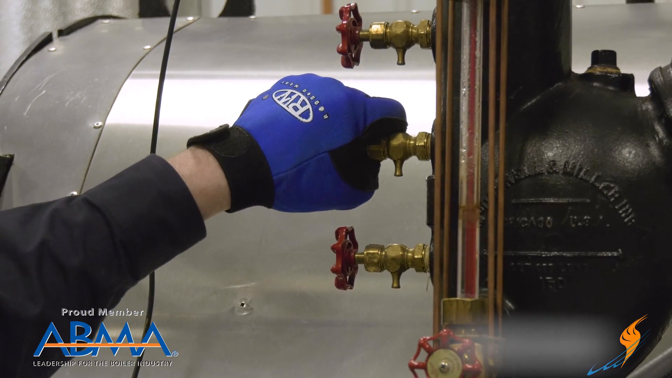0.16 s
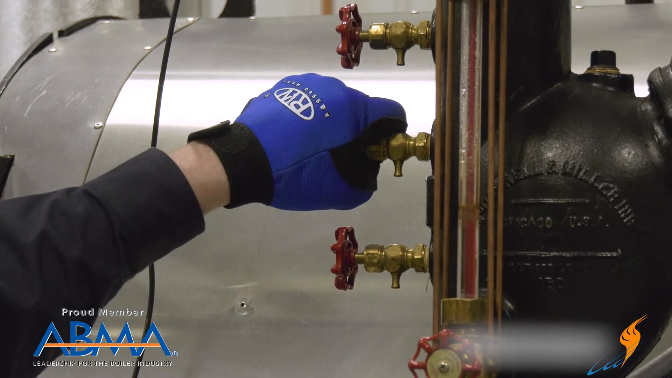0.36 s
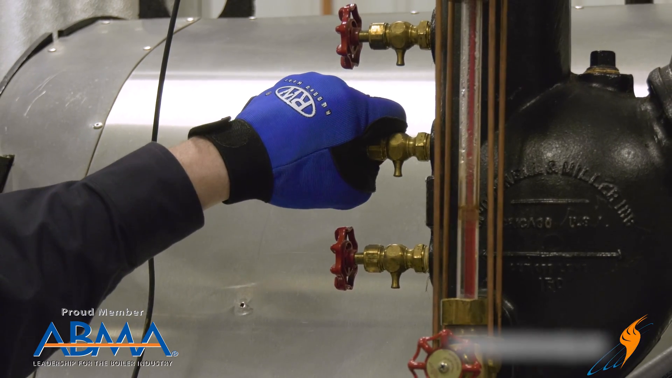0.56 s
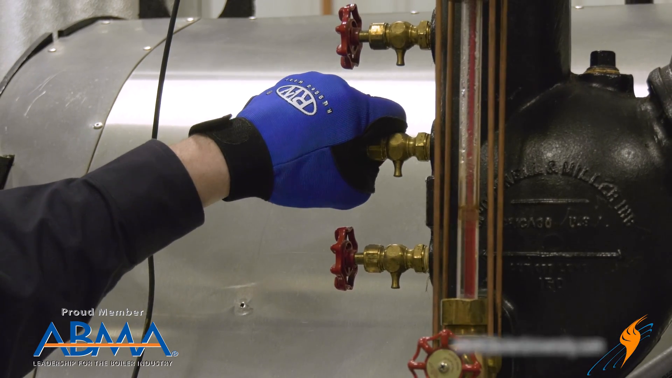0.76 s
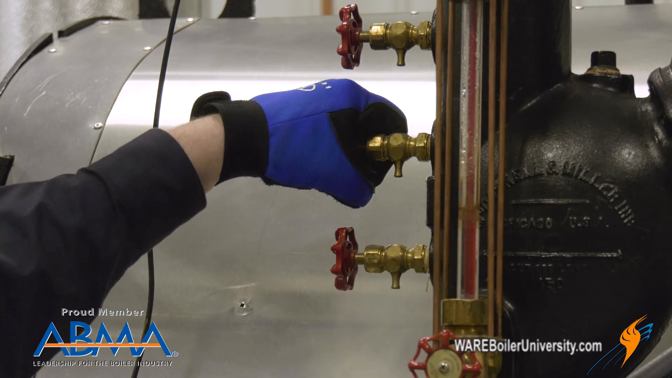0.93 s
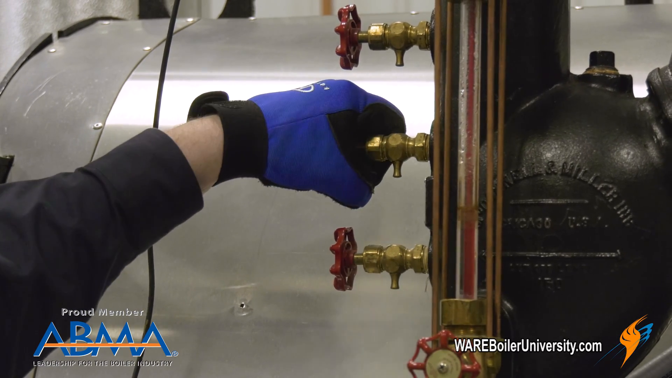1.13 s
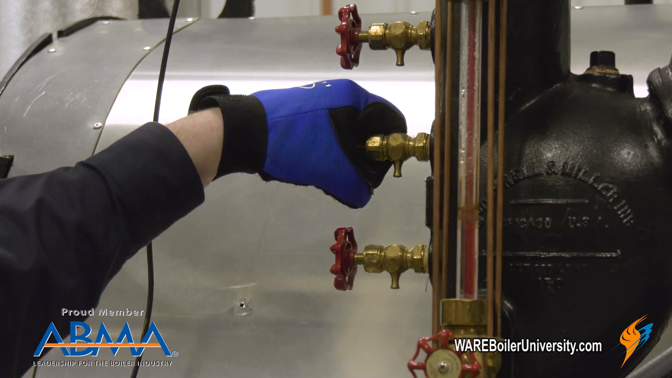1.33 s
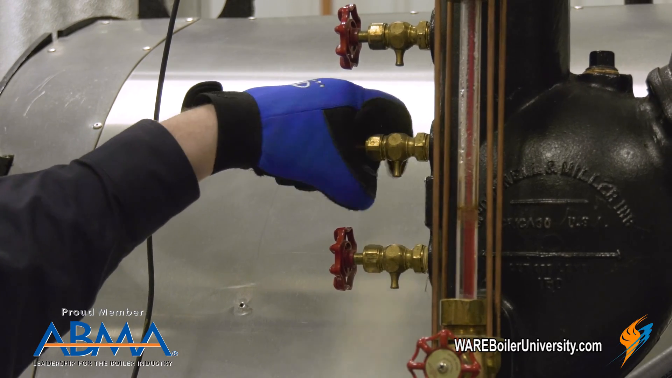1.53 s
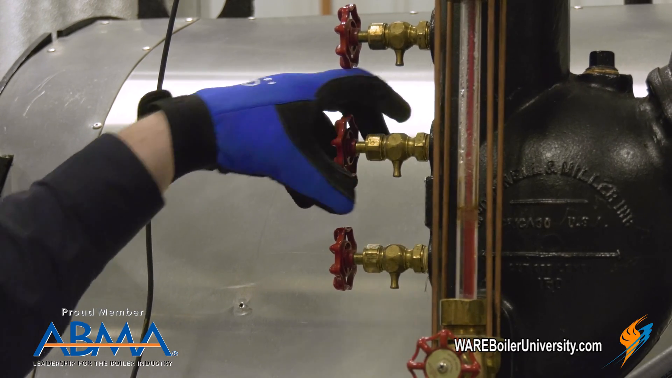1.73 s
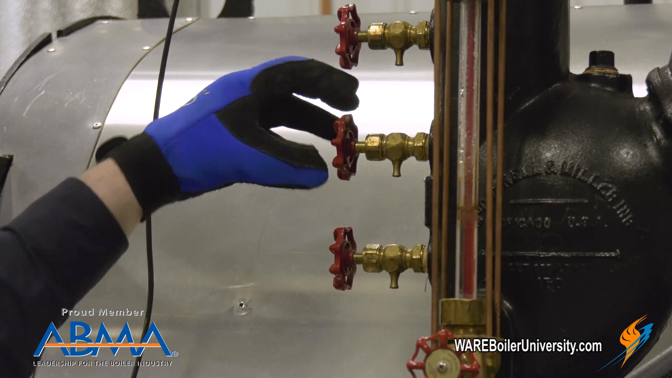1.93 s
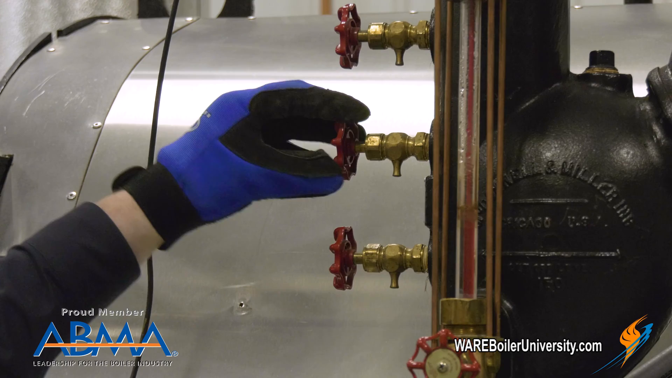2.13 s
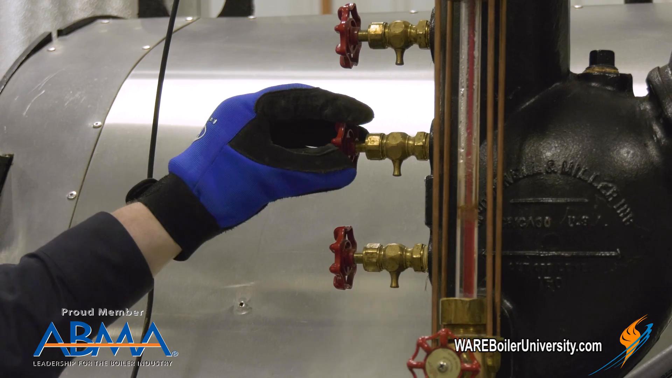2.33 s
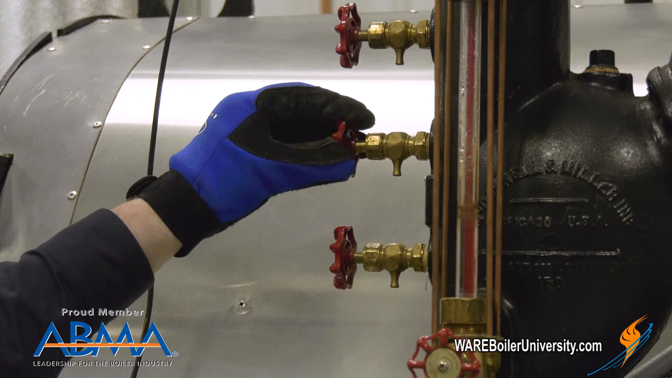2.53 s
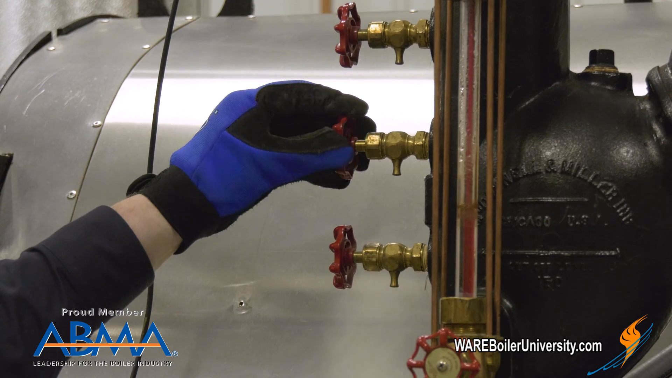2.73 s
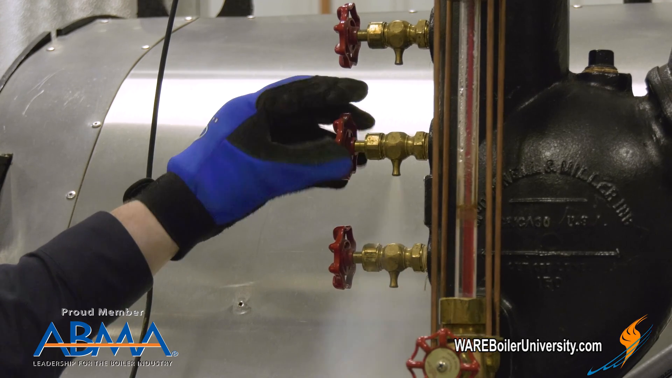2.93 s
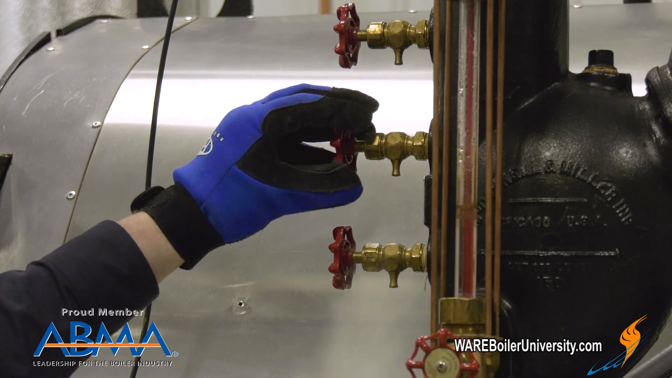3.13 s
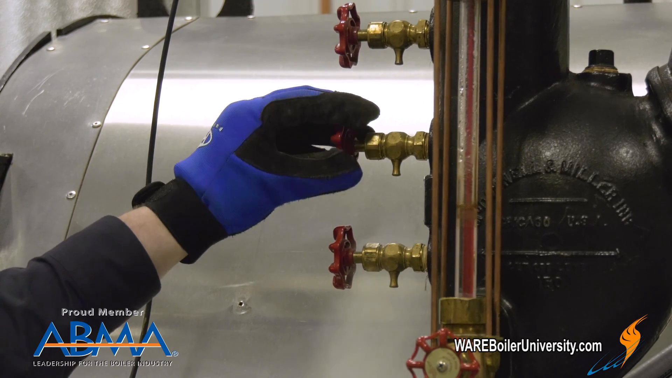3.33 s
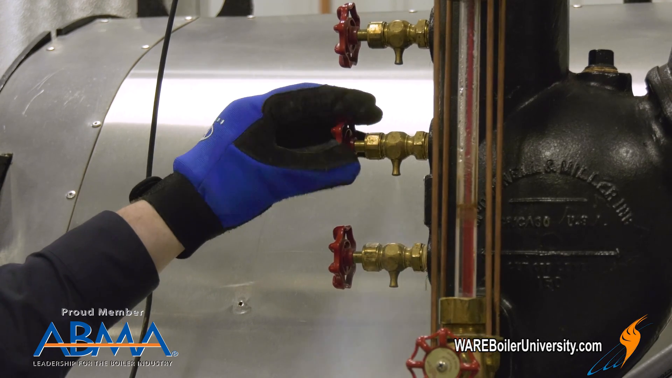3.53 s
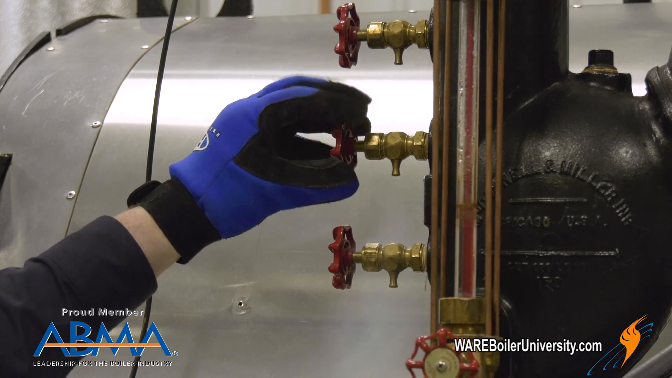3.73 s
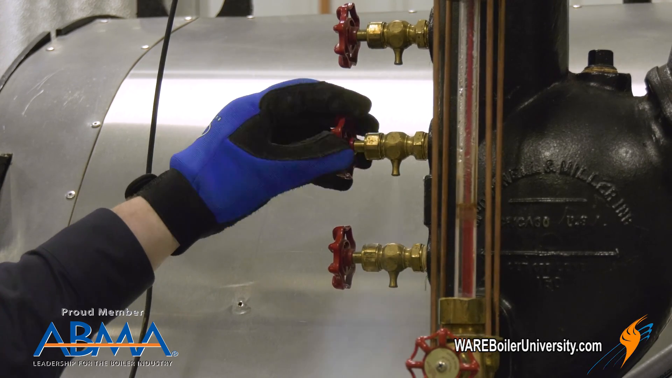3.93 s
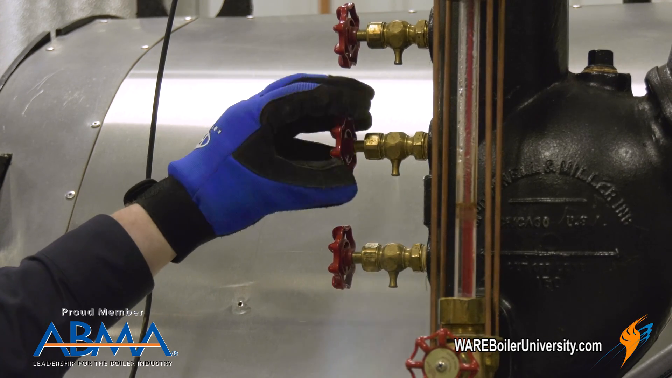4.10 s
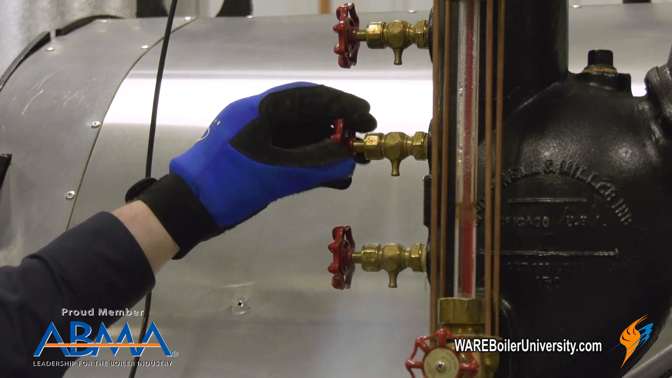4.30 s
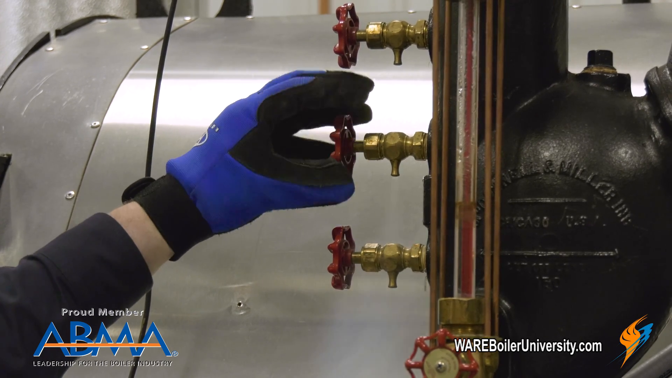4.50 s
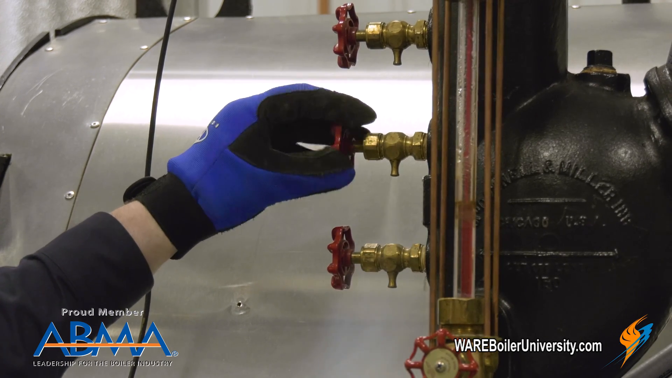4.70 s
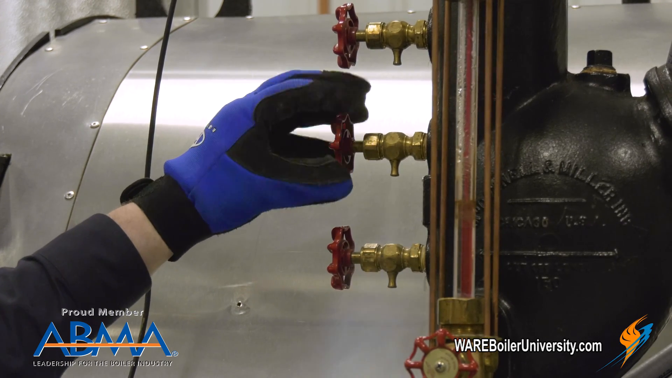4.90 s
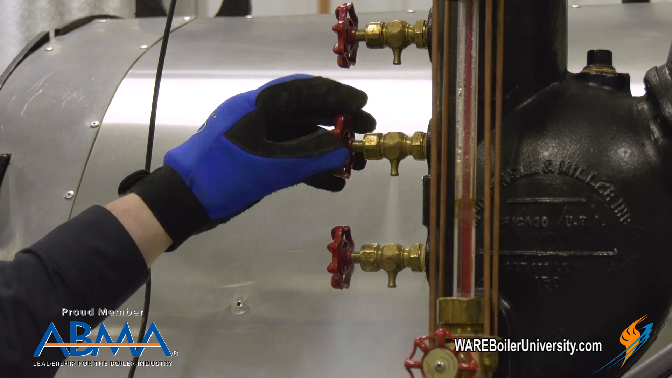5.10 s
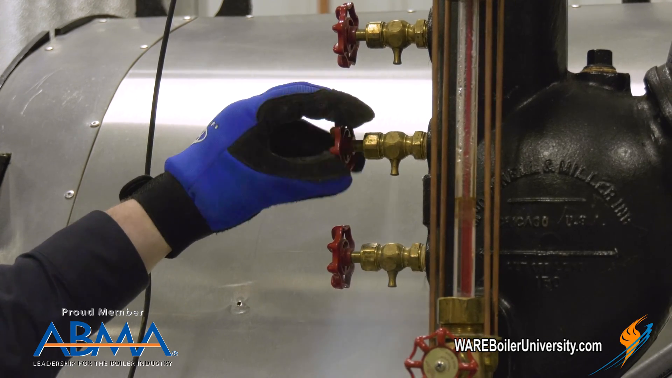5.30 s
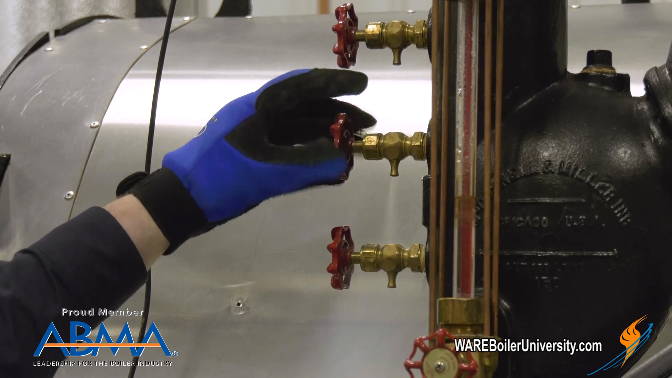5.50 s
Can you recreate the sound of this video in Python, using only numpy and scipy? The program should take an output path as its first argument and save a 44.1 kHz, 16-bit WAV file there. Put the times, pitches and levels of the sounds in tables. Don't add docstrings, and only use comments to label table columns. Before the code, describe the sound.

Quiet boiler-room hum, a brief creak and whistling spit, ticking water droplets in a thin hiss, then a loud full steam-like jet.

```python
import sys
import numpy as np
from scipy import signal
from scipy.fft import rfft, irfft
from scipy.io import wavfile
from scipy.ndimage import uniform_filter1d

SR = 44100
rng = np.random.default_rng(int(sys.argv[2]) if len(sys.argv) > 2 else 0)


def inscribe(sig):
    pcm = np.round(np.clip(np.atleast_2d(sig).T, -1, 1) * 32767)
    wavfile.write(sys.argv[1], SR, pcm.astype(np.int16))


def gain_from_decibels(decibels):
    exponent = np.asarray(decibels, float) / 20
    return 10 ** exponent


N = 244755
HOP = 128
HZ = np.fft.rfftfreq(4 * HOP, 1 / SR)[:, None]
FRAME_S = np.arange(N // HOP + 5) * HOP / SR


def evened(x):
    return x / np.sqrt(np.mean(x ** 2) + 1e-30)


def read(points, hz):
    f, value = np.transpose(points)
    return np.interp(np.log(hz + 1), np.log(f), value)


def curves(rows, t):
    s, *columns = np.transpose(rows)
    return [np.interp(t, s, c) for c in columns]


def add(mix, s, sound):
    part = mix[round(s * SR):][:len(sound)]
    part += sound[:len(part)]


def ramp(t, start_s, rise_s):
    return np.clip((t - start_s) / rise_s, 0, 1)


def settle(t, start_s, time_s):
    return 1 - np.exp(-np.maximum(t - start_s, 0) / time_s)


def bumps(rows):
    return sum(np.exp(-(2 * (HZ - hz) / width) ** 2) * db for hz, width, db in rows)


def layer(shape):
    power = gain_from_decibels(read(shape, HZ)) ** 2
    return power / power.sum()


def noise(power):
    overlap = dict(nperseg=4 * HOP, noverlap=3 * HOP)
    a, b = rng.standard_normal((len(FRAME_S), len(HZ), 2)).T
    random_bins = a + 1j * b
    white = signal.istft(random_bins, **overlap)[1].std() * np.sqrt(len(HZ))
    shaped = signal.istft(random_bins * np.sqrt(power), **overlap)[1][:N]
    return shaped / white * len(HZ)


def drift(frames, bins):
    field = rng.standard_normal((len(FRAME_S), len(HZ))).T
    field = uniform_filter1d(field, int(bins), axis=0)
    return evened(uniform_filter1d(field, int(frames), axis=1))


def resonate(x, hz, width):
    turn = np.exp(2j * np.pi * np.cumsum(hz * np.ones(len(x))) / SR)
    r = np.exp(-np.pi * width / SR)
    return 2 * (turn * signal.lfilter([1 - r], [1, -r], x / turn)).real


# pitch in Hz, level in dB per Hz.
ROOM_WASH = [(25, -40), (45, -27), (65, -1), (110, 0), (170, -6), (350, -20), (700, -18.5), (1800, -22),
             (3000, -26), (5000, -29.5), (7500, -35), (10000, -38), (13000, -41), (15700, -45)]
# pitch in Hz, width in Hz, boost in dB.
FAN_RESONANCES = [(120, 17, 4), (298, 30, 12), (1240, 200, 6), (1480, 250, 7), (3600, 400, 7),
                  (4400, 250, 11), (5930, 250, 5), (7950, 300, 11)]
# pitch in Hz, level in dB.
MOTOR_TONES = [(60.5, -66), (119.9, -59.5), (1199, -80), (1426, -79), (2099, -80), (2702, -87), (7932, -77),
               (8000, -80), (8069, -72)]


def plant_room():
    fade_db = 4 * ramp(FRAME_S, 0.27, 0.16) + 10 * np.minimum(FRAME_S, 1)
    low_db, high_db = -56.5 - fade_db, -66 - 0.6 * fade_db
    draught = layer([(100, -8), (300, -2), (600, -8), (1200, -21), (4000, -39)]) * gain_from_decibels(low_db) ** 2
    airy = layer([(2000, 0), (4000, 2), (9000, -4), (12000, -11), (15000, -15)])
    draught = draught + airy * gain_from_decibels(high_db) ** 2

    t = np.arange(N) / SR
    white = rfft(rng.standard_normal(N))
    hz = np.fft.rfftfreq(N, 1 / SR)
    fans_db = sum(db * np.exp(-(2 * (hz - fan_hz) / width) ** 2) for fan_hz, width, db in FAN_RESONANCES)
    wash = evened(irfft(white * gain_from_decibels(read(ROOM_WASH, hz) + fans_db), N))
    burner_db = -56
    for line_hz, db in MOTOR_TONES:
        waver = 1 + 0.08 * evened(resonate(rng.standard_normal(N), 0, 12))
        tone = np.sin(2 * np.pi * (line_hz * t + rng.random()))
        wash = wash + np.sqrt(2) * gain_from_decibels(db - burner_db) * waver * tone
    sink_db = 10.5 * settle(t, 1.6, 0.54)
    return gain_from_decibels(burner_db - sink_db) * wash + noise(draught)


def whistle_track(t):
    lead_s, dive_s, dive_end_s = 0.951, 0.9728, 0.9887
    edge_db_per_s = 6000
    hz = 15600 - 420000 * np.clip(t - dive_s, 0, 0.02)
    lead_db = -39 + 3 * np.cos(2 * np.pi * 130 * (t - 0.958))
    sag_db = np.where(t < dive_s, edge_db_per_s / 2 * (dive_s - t), 170 * (t - dive_s))
    dive_db = -25.5 - sag_db
    outside_s = np.maximum(lead_s - t, 0) + 4 * np.maximum(t - dive_end_s, 0)
    return hz, np.maximum(lead_db, dive_db) - edge_db_per_s * outside_s


# time in seconds, level in dB.
SPURT_HISS = [
    (.8835, -75),
    (.887, -45),
    (.898, -43.5),
    (.905, -38.5),
    (.94, -39),
    (.952, -34.5),
    (.977, -32.5),
    (.999, -48),
    (1.1, -68),
]
# pitch in Hz, level in dB per Hz.
SPURT_COLOUR = [(300, -8), (1500, -1), (2600, -7), (3500, -2), (6500, -1), (8000, -6), (9000, 0),
                (11500, -4), (15700, -5)]
# time in seconds, height (minus sucks inward), width in milliseconds.
PRESSURE_POPS = [
    (.9598, .06, .2),
    (.9661, -.07, .45),
    (.9687, .05, .2),
    (.9745, -.04, 1.2),
    (.9779, -.05, .25),
    (.9787, .11, .25),
    (.9801, .05, .25),
]


def spurt():
    t = np.arange(N) / SR
    hiss_db = curves(SPURT_HISS, t)[0]
    live = (t > SPURT_HISS[0][0]) & (t < SPURT_HISS[-1][0])
    low_share = 0.2
    hiss = (1 - low_share) * noise(layer(SPURT_COLOUR))
    hiss = hiss + low_share * noise(layer(ROAR) + layer(RUMBLE))
    spit = gain_from_decibels(1.8 * evened(uniform_filter1d(rng.standard_normal(N), size=60)))

    hz, whistle_db = whistle_track(t)
    pure = np.sqrt(2) * np.sin(2 * np.pi * np.cumsum(hz) / SR)
    breath = evened(resonate(rng.standard_normal(N), hz, 700))
    tone = np.clip((15500 - hz) / 300, 0, 1) * pure + 0.45 * breath
    whistle = (whistle_db > -59) * gain_from_decibels(whistle_db) * tone

    pops = sum(height * np.exp(-((t - s) * 1000 / ms) ** 2) for s, height, ms in PRESSURE_POPS)
    return live * (gain_from_decibels(hiss_db) * spit * hiss + pops) + whistle


# time in seconds, level in dB.
STEM_EFFORT = [
    (.893, -60),
    (.901, -35),
    (.91, -31),
    (.919, -31),
    (.924, -27.5),
    (.93, -29),
    (.937, -30),
    (.946, -39),
    (.96, -58),
]
# pitch in Hz, width in Hz, level in dB.
STEM_NOTES = [(660, 110, 0), (930, 250, -3), (1200, 240, -3), (1520, 280, -5), (1900, 200, -8),
              (440, 200, -8)]


def creak():
    t = np.arange(N) / SR
    slips_per_s = 1800
    slips = (rng.random(N) < slips_per_s / SR) * rng.standard_normal(N)
    ring = sum(gain_from_decibels(db) * evened(resonate(resonate(slips, hz, width), hz, 2 * width))
               for hz, width, db in STEM_NOTES)
    ring = ring / np.sqrt(uniform_filter1d(ring ** 2, size=400) + 0.05)
    live = (t > STEM_EFFORT[0][0]) & (t < STEM_EFFORT[-1][0])
    return live * gain_from_decibels(curves(STEM_EFFORT, t)[0]) * ring


# time in seconds, level in dB.
NOZZLE_FLOW = [(1.0, -49), (1.05, -54), (1.18, -51), (1.33, -46.5), (1.6, -52), (1.75, -46), (1.92, -48.5),
               (2.44, -48.5), (2.65, -44.5), (2.9, -36), (3.17, -37), (3.38, -36.5), (3.56, -31.5),
               (3.9, -30), (3.96, -29), (4.27, -26.5), (4.5, -24.5), (5.55, -24.5)]
# time in seconds, change in dB, rise in seconds, fall in seconds.
FLOW_SURGES = [
    (1.36, -0.5, .03, .04),
    (1.52, 2.2, .04, .03),
    (1.605, 2, 0.041, .012),
    (1.628, 10.5, .006, 0.042),
    (3.01, 3.5, 0.024, 0.047),
    (3.09, 2, 0.065, 0.043),
    (3.99, 2, 0.038, 0.22),
    (5.2, 0.55, .1, 0.12),
]


def layer_levels(t):
    flow_db = curves(NOZZLE_FLOW, t)[0]
    surge_db = sum(db * np.exp(-np.where(t < s, ((s - t) / rise) ** 2, (t - s) / fall))
                   for s, db, rise, fall in FLOW_SURGES)
    thin_db = -48

    water = ramp(t, 1.277, 0.11) * (1 - ramp(t, CLEARS_S, 0.013))
    open_slope = 0.85
    slope = 0.46 + (open_slope - 0.46) * ramp(flow_db, -39.5, 3)
    body_db = -46 + np.where(flow_db > thin_db, slope, open_slope) * (flow_db - thin_db)
    body_db = body_db + 0.53 * surge_db + 7 * water

    knee_db = -31.5
    below = np.minimum(flow_db, knee_db) - thin_db
    above = np.maximum(flow_db - knee_db, 0)
    fizz_db = -46.5 + 1.09 * below + 0.45 * above + 0.83 * surge_db
    fizz_db = fizz_db - 10 * (1 - ramp(t, 1.15, 0.1))
    fizz_db = fizz_db - 3.5 * settle(t, 4.13, 0.25)
    return flow_db + surge_db, body_db, fizz_db, surge_db


CLEARS_S = 1.62
# pitch in Hz, level in dB per Hz.
ROAR = [(150, -40), (300, -0.5), (500, 1), (1000, 0), (1900, -2.5), (2400, -15.5), (4000, -9), (9000, -27)]
BODY = [(800, -40), (2000, 2), (3000, -2), (4500, -0.5), (6500, 1.5), (8000, -4.5), (9000, -6.5),
        (14000, -8.5)]
FIZZ = [(4000, -15), (7500, 0.5), (8800, 3.5), (10000, -0.5), (11500, -3.5), (13000, -0.5), (15700, -8)]
RUMBLE = [(20, -35), (40, -12), (80, -6), (150, -5), (250, 2), (400, -38), (1000, -24.5)]
# pitch in Hz, width in Hz, boost in dB while sputtering,
# boost in dB for a thin jet, boost in dB for a full jet.
NEARBY_METAL = [(474, 600, -6, 2, -1), (990, 250, -6.5, 3, -0.5), (1360, 240, 0.5, 4.5, -0.5),
                (1880, 840, 0.5, -2, -0.5), (2720, 1070, -4, -5, 1), (3350, 280, 8.5, 9, -1),
                (4050, 140, 4, 6.5, -2.5), (4600, 470, -6, 1.5, 1), (5280, 710, -4, -1, 1),
                (6050, 250, 0, 2, 2), (6900, 2840, -8, 1, -2.5), (8190, 780, -7, -6.5, -4.5),
                (9680, 410, 8.5, 6.5, 2.5), (10100, 230, 9, 6.5, -4), (11000, 950, -4, -3.5, -2),
                (11700, 400, -8, -2, 2.5), (12800, 350, -10, 0, 0.5), (13600, 300, -6, 4, -3),
                (13950, 200, -7, 1, -4), (15200, 1700, -1, 5.5, 0), (12350, 350, -7, 0, -2),
                (7750, 300, 3, 0, -3), (8900, 500, 6, 4.5, -0.5), (13150, 300, -6, -2, -6)]


def jet():
    roar_db, body_db, fizz_db, surge_db = layer_levels(FRAME_S)
    full = np.clip((roar_db + 41) / 16, 0, 1)
    wet = np.clip((CLEARS_S - FRAME_S) / 0.032, 0, 1)
    rumble_db = roar_db - 16.5 + 8.64 * full
    levels = ((ROAR, roar_db), (BODY, body_db), (FIZZ, fizz_db), (RUMBLE, rumble_db))
    power = sum(layer(shape) * gain_from_decibels(db) ** 2 for shape, db in levels)

    colour_db = bumps((hz, width, wet * wet_db + (1 - wet) * (thin_db + (full_db - thin_db) * full))
                      for hz, width, wet_db, thin_db, full_db in NEARBY_METAL)

    keep = np.exp(-HOP / SR / 0.17)
    rise_db = curves(NOZZLE_FLOW, FRAME_S)[0] - NOZZLE_FLOW[0][1]
    ahead_db = rise_db - signal.lfilter([1 - keep], [1, -keep], rise_db)
    colour_db = colour_db + bumps([(380, 310, -0.23 * ahead_db)])

    colour_db = colour_db + bumps([(1160, 1100, 0.7 * surge_db)])

    crest_hz = np.clip(14870 + 150 * (FRAME_S - CLEARS_S), 14870, 15200)
    depth_db = 5.5 * (1 - settle(FRAME_S, CLEARS_S, 1.7))
    ripple = np.cos(2 * np.pi * 24 * HZ / crest_hz)
    colour_db = colour_db + depth_db * ripple * np.clip((HZ - 13700) / 400, 0, 1)

    patchy_db = 1.07 * drift(13, 2.7)
    flicker_db = 0.5 * (1.2 - 0.21 * full) * drift(2, 60) * (HZ > 400)
    opened = np.clip((FRAME_S - 0.975) / 0.015, 0, 1)
    return noise(power * opened * gain_from_decibels(colour_db + patchy_db + flicker_db) ** 2)


# time in seconds, low knock in dB, fizz in dB,
# length in milliseconds.
WATER_SLUGS = [(1.261, -34.5, -50, 3.2), (1.299, -47, -55, 2.8), (1.372, -40, -44, 4.6),
               (1.381, -32.5, -48, 2.3), (1.385, -54, -31, 4), (1.407, -41, -50, 10),
               (1.449, -37, -50, 2.5), (1.4577, -40, -35, 6), (1.484, -42, -35, 3.7),
               (1.5645, -34.5, -49, 1.5), (1.581, -41, -39, 3.6), (1.622, -46, -40, 9.2),
               (1.633, -44, -44, 21), (1.858, -39, -55, 6), (2.035, -44, -55, 4.3),
               (2.153, -37.5, -55, 3.5), (2.502, -39, -55, 5), (3.011, -38, -52, 26), (3.05, -48, -50, 20),
               (3.09, -35, -50, 20)]


def slugs():
    knock = sum(resonate(rng.standard_normal(N), hz, width) for hz, width in ((1100, 470), (1900, 250)))
    bright = gain_from_decibels(6.0 * np.exp(-((HZ - 9500) / 900) ** 2)) ** 2
    spray = noise(layer(FIZZ) * bright + 0.27 * layer(BODY))
    t = np.arange(4000) / SR
    low, high, ticks = np.zeros(N), np.zeros(N), np.zeros(N)
    low_tick = np.exp(-t / 0.0011) * np.sin(2 * np.pi * 1400 * t)
    high_tick = np.exp(-t / 0.0003) * np.sin(2 * np.pi * 10500 * t)
    for s, knock_db, fizz_db, ms in WATER_SLUGS:
        puff = (1 - np.exp(-t / 0.00058)) * np.exp(-t * 1000 / ms)
        add(low, s, gain_from_decibels(knock_db) * puff)
        add(high, s, gain_from_decibels(fizz_db) * puff)
        add(ticks, s, gain_from_decibels(knock_db + 6.5) * low_tick)
        add(ticks, s, gain_from_decibels(fizz_db + 7.0) * high_tick)
    return low * evened(knock) + high * evened(spray) + ticks


def scene():
    mono = plant_room() + spurt() + creak() + jet() + slugs()
    return np.array([mono, mono])


def top_cut(x):
    return signal.sosfilt(signal.butter(12, 16940, fs=SR, output="sos"), x)


# time in seconds, lowest pitch in Hz, highest pitch in Hz.
WIDE_MOMENTS = [(.2, 4600, 5800), (.526, 8300, 9700), (.665, 9700, 11000), (.665, 11700, 13100),
                (2.104, 13800, 15700), (3.335, 4700, 5700), (3.706, 5600, 6950), (3.706, 9650, 12400),
                (3.706, 13800, 15200), (4.264, 14450, 15700), (4.333, 11000, 12400), (4.357, 6890, 8270),
                (4.357, 9650, 11800), (4.357, 13100, 15700), (4.403, 8270, 9650), (4.473, 5700, 6950),
                (4.752, 4200, 5150), (4.752, 10340, 11700), (4.798, 5600, 7600), (4.798, 11000, 13100),
                (5.193, 5150, 6890), (5.449, 8960, 10340), (5.472, 4200, 5150), (5.472, 8960, 11000)]


def record(dry):
    mid = signal.lfilter(*signal.butter(2, 40, "high", fs=SR), dry[0])
    band_limit = signal.firwin(1023, 15760, window=("kaiser", 9), fs=SR)
    mid = signal.oaconvolve(mid, band_limit, "same")
    side, hz, window = np.zeros(N), np.fft.rfftfreq(2048, 1 / SR), np.kaiser(2048, 5)
    for s, lowest_hz, highest_hz in WIDE_MOMENTS:
        start = round(s * SR) - 1024
        band = uniform_filter1d(abs(rfft(mid[start:start + 2048])), size=20)
        band = band * ((hz > lowest_hz) & (hz < highest_hz))
        scrambled = irfft(band * np.exp(2j * np.pi * rng.random(len(hz))))
        add(side, start / SR, gain_from_decibels(-2.0) * window * scrambled)
    return top_cut(np.array([mid + side, mid - side]))


dry = scene()
out = record(dry)
inscribe(out)
```